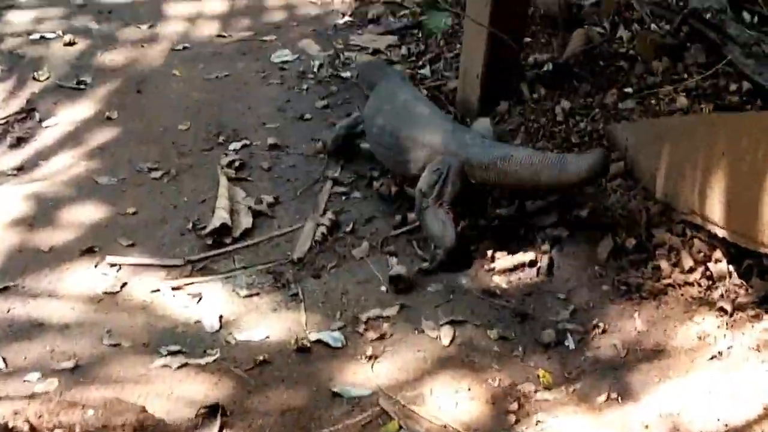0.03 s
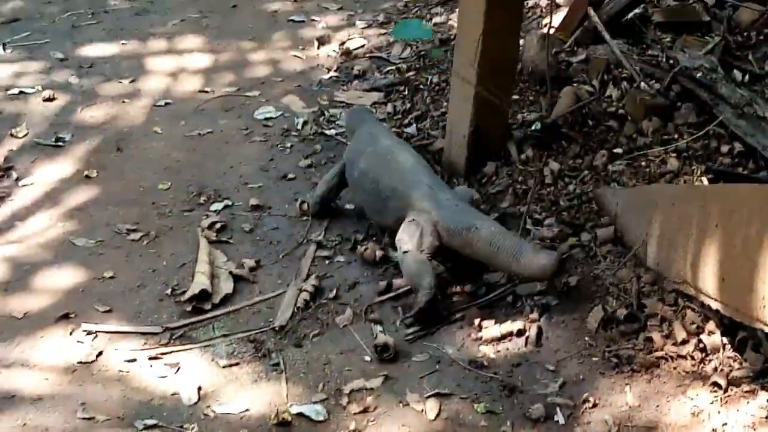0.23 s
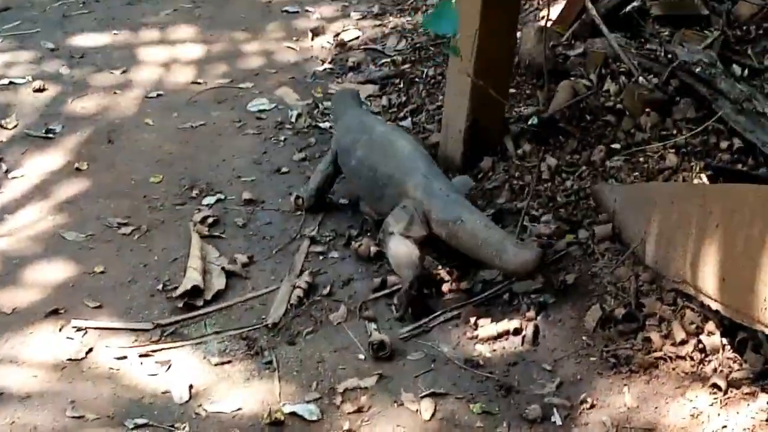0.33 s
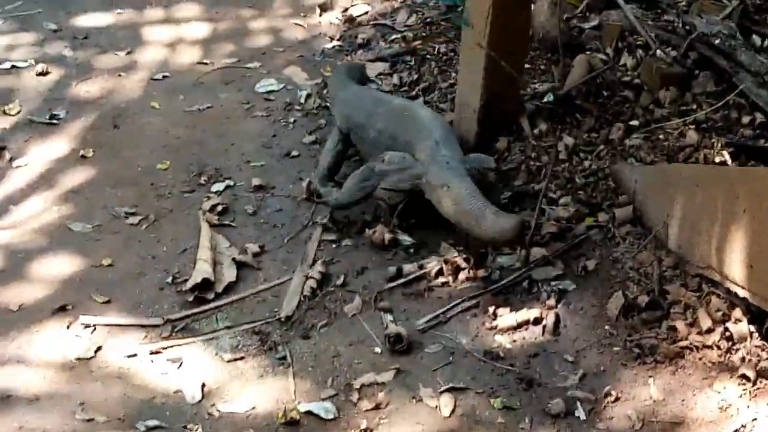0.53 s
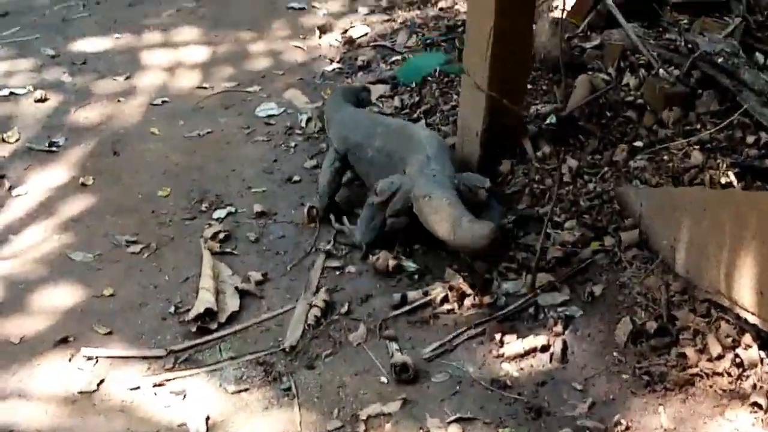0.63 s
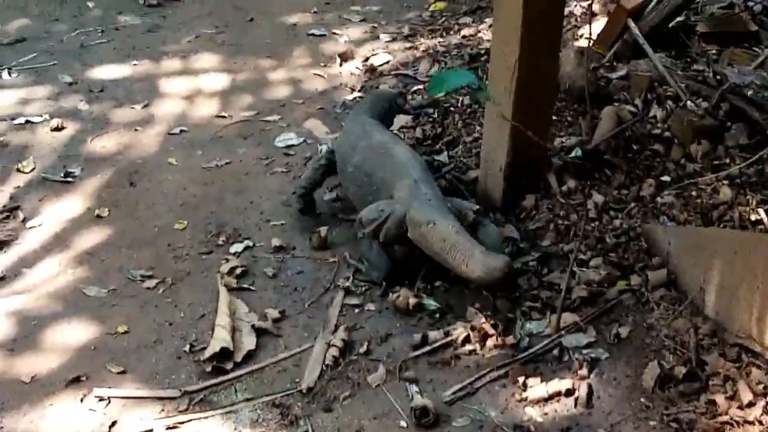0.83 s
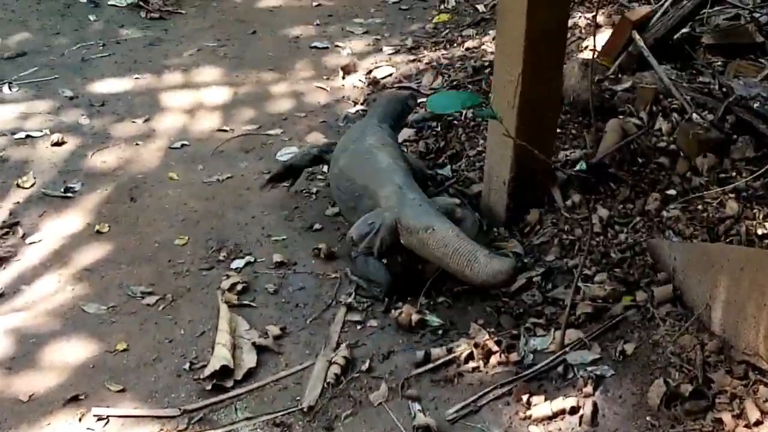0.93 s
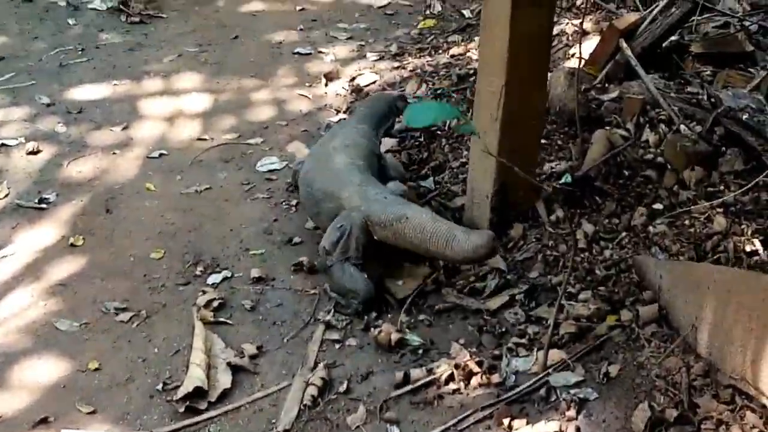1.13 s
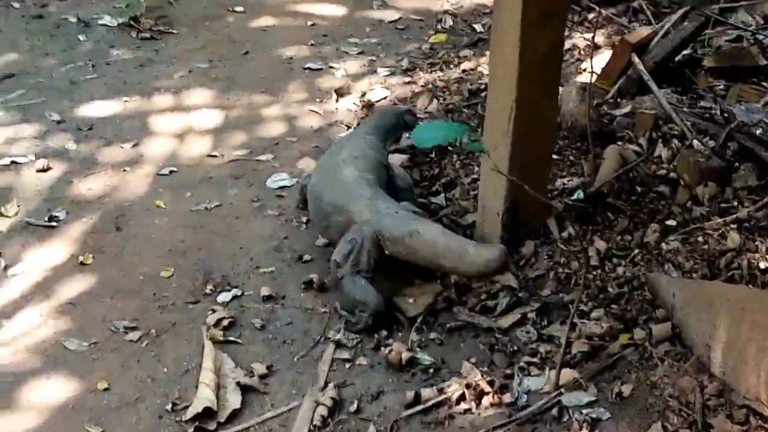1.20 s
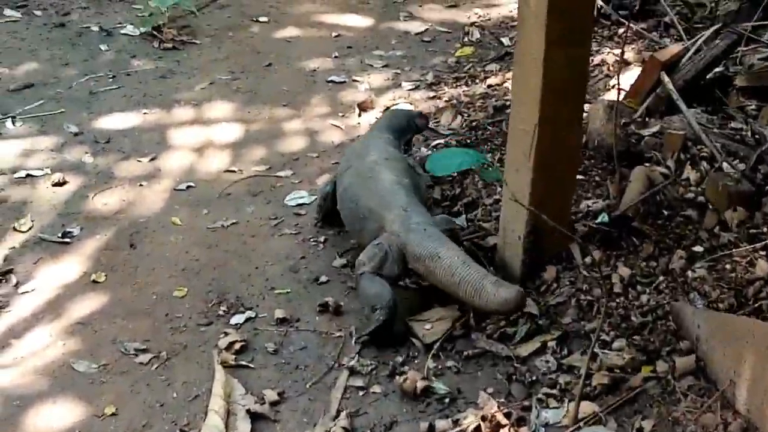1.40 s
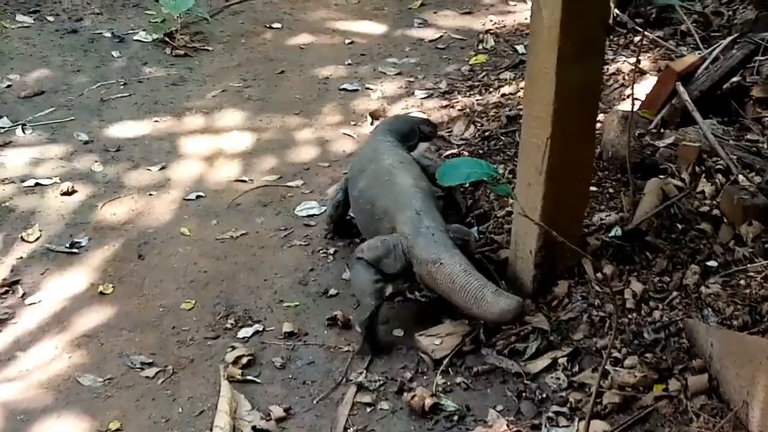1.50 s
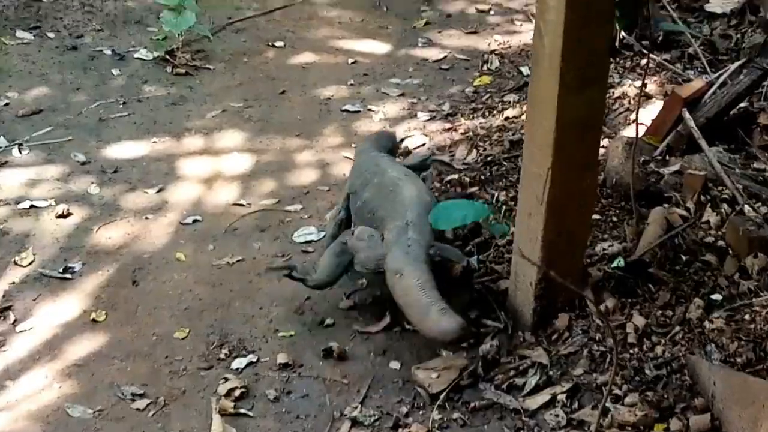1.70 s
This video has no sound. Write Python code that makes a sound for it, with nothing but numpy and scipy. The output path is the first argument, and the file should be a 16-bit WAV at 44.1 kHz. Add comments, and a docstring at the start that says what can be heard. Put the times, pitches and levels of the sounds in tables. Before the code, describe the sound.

A large lizard's steps crunching through dry leaf litter, with sharp snaps and faint birds.

```python
"""A dirt path at the edge of dry leaf litter, a hand-held phone two metres from a large lizard.
It walks off the path into the leaves: feet pat and scrape the soil and crush leaves, stalks snap,
loose sticks ring, and belly and tail drag through the litter. Faint birds call behind, over
steady outdoor air, and a low hum swells and fades as the phone is carried along."""
import sys
import numpy as np
from scipy import signal
from scipy.fft import rfft, irfft, next_fast_len
from scipy.io import wavfile

SR = 44100
rng = np.random.default_rng(int(sys.argv[2]) if len(sys.argv) > 2 else 0)


def master_out(mix):
    """Clip the mix to full scale and print it as 16-bit PCM to the path in sys.argv[1]."""
    frames = np.transpose(np.atleast_2d(mix))
    ceiling = np.clip(frames, -1, 1)
    pcm = np.round(ceiling * 32767).astype(np.int16)
    wavfile.write(sys.argv[1], SR, pcm)


N = 77175
CLICK_SAMPLES = 1024
ONE_PORT_SHARE = .4  # share of the ticks that reach only one of the two microphone ports


def undb(db):
    """Decibels to gain."""
    return 10 ** (np.asarray(db) / 20)


def unit(x):
    """Scale to rms 1."""
    return x / np.sqrt(np.mean(x ** 2) + 1e-18)


def times():
    """Time of each sample in seconds."""
    return np.arange(N) / SR


def curve(rows):
    """Gain along (time_s, level_db) points."""
    return undb(np.interp(times(), *np.array(rows).T))


def shape(x, gain_db):
    """Minimum-phase filter following gain_db(octave), where octave is log2 of the frequency."""
    size = 2 * next_fast_len(len(x) // 2 + CLICK_SAMPLES)
    octave = np.log2(np.maximum(np.arange(size // 2 + 1) * SR / size, 1))
    cepstrum = irfft(np.log(undb(gain_db(octave))))
    cepstrum[1:size // 2] *= 2
    cepstrum[size // 2 + 1:] = 0
    return irfft(rfft(x, size) * np.exp(rfft(cepstrum)))[:len(x)]


def colour(x, points):
    """Filter by (freq_hz, gain_db) points."""
    hz, db = np.array(points).T
    return shape(x, lambda octave: np.interp(octave, np.log2(hz), db))


def wander(rate_hz):
    """Random drift with a spread near 1."""
    knots = rng.standard_normal(N // 50)
    return 1.2 * np.interp(times() * rate_hz, np.arange(len(knots)), knots)


def clicks(per_s, spread_db, size=N):
    """Random clicks of unequal size."""
    hits = rng.random(size) < per_s / SR
    signs = rng.choice([-1, 1], size)
    return hits * signs * undb(spread_db * np.clip(rng.standard_normal(size), -3, 3))


def tail(decay_s, size=N):
    """Dying noise of energy 1."""
    return unit(rng.standard_normal(size) * np.exp(-np.arange(size) / SR / decay_s)) / np.sqrt(size)


def delay(x, start_s):
    """Place a sound start_s into the scene."""
    return np.concatenate([np.zeros(round(start_s * SR)), x, np.zeros(N - len(x))])[:N]


def crackle(per_s, spread_db, spectrum):
    """Many small fragments, each ticking in its own band; some face only one port."""
    edges_hz = [20, 1000, 2000, 4000, 8000, 18000]
    out = 0
    for band in zip(edges_hz, edges_hz[1:]):
        shared = clicks(per_s * (1 - ONE_PORT_SHARE), spread_db)
        ticks = [unit(shared + clicks(per_s * ONE_PORT_SHARE, spread_db)) for _ in range(2)]
        out += signal.sosfilt(signal.butter(2, band, "band", fs=SR, output="sos"), ticks)
    return unit(np.array([colour(side, spectrum) for side in out]))


# Open air all around the microphone: freq_hz, gain_db
AIR_SPECTRUM = [(20, -3.5), (50, -4.5), (110, 1.5), (250, -9.5), (600, -10.5), (2000, -14), (7000, -33),
                (10000, -42), (16000, -51)]
def air():
    """A steady bed of soft, dark noise."""
    return undb(-61) * unit(colour(rng.standard_normal(N), AIR_SPECTRUM))


# Hum at the phone as it is carried: time_s, level_db
HUM_SWELLS = [(0.0, -50), (0.048, -57.5), (0.082, -69), (0.214, -75), (0.276, -48.5), (0.418, -50.5),
              (0.642, -86), (0.75, -47), (0.96, -53), (1.126, -78), (1.242, -50), (1.306, -48),
              (1.34, -70.5), (1.438, -49.5), (1.51, -82), (1.618, -81), (1.676, -44.5), (1.75, -50)]
def hum(pitch_hz=73.3, waver=0.065, trim_db=-0.5):
    """A low, wavering resonance that comes and goes at walking pace."""
    hz = pitch_hz * (1 + waver * wander(25.44))
    return curve(HUM_SWELLS) * undb(trim_db) * unit(np.sin(2 * np.pi * np.cumsum(hz) / SR))


# Birds far behind the lizard: middle_s, half_length_s, pitch_hz, glide_hz_per_s, level_db, blur_hz
BIRD_CALLS = [(0.169, 0.048, 5630, -4, -54.5, 87.3), (.86, 0.027, 707, 2000.5, -50.5, 90.25),
              (0.871, 0.033, 984, 1001, -57.5, 60.7), (0.972, 0.076, 470.5, -1, -63.5, 101),
              (1.148, 0.031, 2925, 1198, -46.5, 479.5), (1.228, 0.054, 2950, 0, -57.5, 300)]
def birds():
    """Faint calls, blurred into narrow bands by the trees."""
    t, out = times(), 0
    for middle, half, hz, glide, db, blur in BIRD_CALLS:
        phase = 2 * np.pi * np.cumsum(hz + glide * (t - middle)) / SR
        tone = unit(wander(blur) * np.sin(phase) + wander(blur) * np.cos(phase))
        out += undb(db) * np.exp(-((t - middle) / half) ** 2) * tone
    return out


# Soft footfalls on packed soil, two metres off: start_s, level_db
FOOTFALLS = [(0.033, -55.5), (.262, -45.5), (.575, -59.5), (1.644, -57)]
# Their dull tone: freq_hz, gain_db
PAT_SPECTRUM = [(60, -9), (150, -10), (300, -8.5), (550, -2), (900, -22), (2000, -58)]
def pats(rise_s=0.0105):
    """A dull pat as a foot takes the weight."""
    t = times()
    push = t / rise_s * np.exp(1 - t / rise_s)
    weight = sum(delay(push, start) * undb(db) for start, db in FOOTFALLS)
    return weight * unit(colour(rng.standard_normal(N), PAT_SPECTRUM))


# Belly and tail dragging through the litter: time_s, level_db
DRAG_LEVELS = [(0, -59.5), (.07, -41.5), (.15, -58.5), (.21, -55), (.4, -45), (.52, -38.5), (.65, -41.5),
               (.71, -49), (.81, -45), (.9, -47.5), (.99, -42), (1.08, -50), (1.3, -52.5), (1.345, -56.5),
               (1.54, -47), (1.605, -65), (1.68, -50), (1.75, -47.5)]
# The litter's rustle: freq_hz, gain_db
LITTER_SPECTRUM = [(200, -26.5), (800, -20), (1800, -11.5), (3200, -2.5), (5000, -1), (7300, 4),
                   (8500, -1.5), (10000, -15), (16000, -22.5)]
def belly():
    """Thin, sparse crackle under the dragging body."""
    return curve(DRAG_LEVELS) * crackle(per_s=700, spread_db=2, spectrum=LITTER_SPECTRUM)


# Sticks and husks knocked on the ground: start_s, level_db, pitch_ratio
STICK_KNOCKS = [(0.502, -30.5, 1.58), (.7212, -32, 1.027), (1.033, -40.5, 1.7)]
# Modes of a stick at pitch_ratio 1: pitch_hz, level_db, t60_s
STICK_MODES = [(789, 0, 0.058), (907, 2, 0.051), (1424, 5.5, 0.021), (1654, 4, 0.037), (1954, 3, 0.044),
               (2320, -22, 0.022)]
def sticks(contact_s=0.002):
    """Loose sticks ring when knocked; shorter ones ring higher and die sooner."""
    t, out = times(), 0
    onset = 1 - np.exp(-(t / contact_s) ** 2)
    for start, db, ratio in STICK_KNOCKS:
        ring = 0
        for hz, mode_db, t60 in STICK_MODES:
            ring += undb(mode_db - 60 * ratio * t / t60) * np.sin(2 * np.pi * hz * ratio * t)
        out += delay(ring * onset, start) * undb(db)
    return out


# Foot strokes, from the path into the leaves: peak_s, rise_s, fall_s, leaf_db, soil_db
FOOT_STROKES = [(0.049, 0.023, 0.017, -38.5, -49.5), (0.226, 0.0065, 0.025, -26.5, -26),
                (0.273, .019, 0.024, -22, -22.5), (0.324, 0.013, 0.051, -27, -25.5),
                (0.43, 0.01, 0.063, -37, -36), (0.564, 0.033, 0.052, -26.5, -44),
                (.685, .008, 0.024, -38.5, -43.5), (1.416, 0.024, 0.014, -34.5, -54.5),
                (1.456, 0.018, 0.034, -38, -46), (1.64, 0.0083, 0.024, -44.5, -44)]
# Stirred leaves and scraped soil: freq_hz, gain_db
LEAF_SPECTRUM = [(200, -71), (700, -26.5), (1400, -11), (2500, -3.5), (4500, 0), (7200, -0.5), (8500, -4),
                 (10500, -13.5), (16000, -20)]
SOIL_SPECTRUM = [(100, -22), (350, -27), (650, -14), (1200, -4.5), (2200, -0.5), (3500, -2.5),
                 (7000, -20.5), (10000, -18), (16000, -32.5)]
def feet(grains_per_s=2200, spread_db=4, slip_db=1.6, slips_per_s=190):
    """Each stroke swells and dies away, stirring leaves and scraping soil as claws catch and slip."""
    t, leaf_power, soil_power = times(), 0, 0
    for peak, rise, fall, leaf_db, soil_db in FOOT_STROKES:
        push = np.exp(-(np.minimum(t - peak, 0) / rise) ** 2 - np.maximum(t - peak, 0) / fall)
        leaf_power += (push * undb(leaf_db)) ** 2
        soil_power += (push * undb(soil_db)) ** 2
    slip = undb(slip_db * wander(slips_per_s))
    leaves = np.sqrt(leaf_power) * crackle(grains_per_s, spread_db, LEAF_SPECTRUM)
    soil = np.sqrt(soil_power) * crackle(grains_per_s, spread_db, SOIL_SPECTRUM)
    return slip * (leaves + soil)


# Dry leaves collapsing underfoot: start_s, length_s, level_db
LEAF_CRUNCHES = [(0.042, 0.0048, -38.5), (0.5017, 0.004, -22.5), (0.539, 0.0019, -21), (0.548, 0.0021, -11),
                 (.558, 0.0036, -16.5), (.5701, 0.00195, -11.5), (0.5846, 0.00272, -13),
                 (0.6456, 0.0031, -33.5), (1.414, 0.0028, -31.5), (1.444, 0.0038, -46)]
# Their bright fractures: freq_hz, gain_db
FRACTURE_SPECTRUM = [(200, -45.5), (600, -21), (1300, -7), (3200, 5.5), (5500, 2.5), (7200, -0.5),
                     (9000, -2), (11000, -11), (16000, -13.5)]
def crunches(fractures_per_s=5000, spread_db=3.5):
    """A leaf gives way in a few milliseconds of fractures."""
    t, out = times()[:CLICK_SAMPLES], np.zeros((2, N))
    for start, length, db in LEAF_CRUNCHES:
        gain = undb(db) * np.sqrt(length * SR / CLICK_SAMPLES)
        shared = clicks(fractures_per_s * (1 - ONE_PORT_SHARE), spread_db, CLICK_SAMPLES)
        for side in range(2):
            own = clicks(fractures_per_s * ONE_PORT_SHARE, spread_db, CLICK_SAMPLES)
            fractures = (shared + own) * (t < length)
            out[side] += gain * delay(unit(colour(fractures, FRACTURE_SPECTRUM)), start)
    return out


# Stalks and leaf ribs snapping, two metres off: start_s, level_db, centre_hz, width_octaves, crack_db
STALK_SNAPS = [(0.0203, -30.5, 4570, 0.9, -30), (0.174, -36, 6940, 0.23, -27),
               (0.5792, -19.5, 5060, 0.74, -25), (0.655, -24, 5960, 0.67, -34),
               (0.7203, -7, 4066, 0.49, -16), (0.732, -18, 3800, 0.52, -13), (.735, -20, 4000, 0.43, -16),
               (.835, -24, 4550, 0.19, -17.5), (0.8554, -20, 7400, 0.32, -17),
               (0.908, -42, 4500, 0.25, -30), (.974, -33.5, 5960, 0.66, -30), (.9826, -18, 6000, 0.44, -40),
               (1.007, -31.5, 3420, 0.68, -30), (1.0346, -22.5, 3390, 0.48, -31),
               (1.0375, -29.5, 3300, 0.8, -19), (1.1002, -32, 6530, 0.66, -17),
               (1.197, -35, 5400, 0.79, -22), (1.452, -29.5, 5030, 0.56, -30),
               (1.463, -27.5, 4360, 0.51, -39), (1.634, -26, 4800, 0.58, -32),
               (1.6893, -33.5, 7560, 0.14, -32)]
def snaps(shiver_db=-7, shiver_s=.0013):
    """A sharp break in the stalk's own band over a broad crack, then a shiver that differs by port."""
    out = np.zeros((2, N))
    low_cut = signal.butter(3, 1000, "high", fs=SR, output="sos")
    for start, db, hz, width, crack_db in STALK_SNAPS:
        def stalk_db(octave):
            band = np.exp(-.5 * ((octave - np.log2(hz)) / width) ** 2)
            return 20 * np.log10(band + undb(crack_db))
        for side in range(2):
            shiver = undb(shiver_db) * tail(shiver_s, CLICK_SAMPLES)
            snap = shape(signal.unit_impulse(CLICK_SAMPLES) + shiver, stalk_db)
            out[side] += delay(unit(signal.sosfilt(low_cut, snap)), start) * undb(db)
    return out * np.sqrt(SR / 1000 / CLICK_SAMPLES)  # each has the energy of 1 ms at its level


def scene(right_lag_s=.000875):
    """The left port hears the lizard first; ground and yard scatter it to each port differently."""
    lizard = feet() + pats() + belly() + crunches() + snaps() + sticks()
    calls, low_hum = birds(), hum()
    out = []
    for direct, lag in zip(lizard, (0, right_lag_s)):
        ground = undb(-5.5) * tail(decay_s=0.0062)
        yard = undb(-13.5) * tail(decay_s=0.039)
        echoes = signal.fftconvolve(direct, delay(ground + yard, 0.0009484))[:N]
        out.append(delay(direct + calls + echoes, lag) + low_hum + air())
    return np.array(out)


# Response of the phone's microphone: freq_hz, gain_db
MIC_RESPONSE = [(100, 1.5), (3500, 0), (7000, -0.5), (8500, -6.5), (10000, -13), (13700, -19.5),
                (14900, -11.5), (15500, -12), (16000, -16)]
# Level of the left port over the shaded right one: freq_hz, lead_db
LEFT_PORT_LEAD = [(70, 7.5), (130, 6), (300, 9), (700, 10.5), (1200, 10.5), (2300, 9), (4000, 7), (7000, 3),
                  (9000, 0), (12000, -3), (15000, -7.5)]
def record(dry, clip_level=.95, top_hz=15900):
    """The phone colours the sound, thins the right side, clips any high peak and cuts the top steeply."""
    left, right = (colour(side, MIC_RESPONSE) for side in dry)
    right = colour(right, [(hz, -db) for hz, db in LEFT_PORT_LEAD])
    top_cut = signal.ellip(10, .2, 80, top_hz, fs=SR, output="sos")
    return signal.sosfilt(top_cut, np.clip([left, right], -clip_level, clip_level))


dry = scene()
out = record(dry)
master_out(out)
```